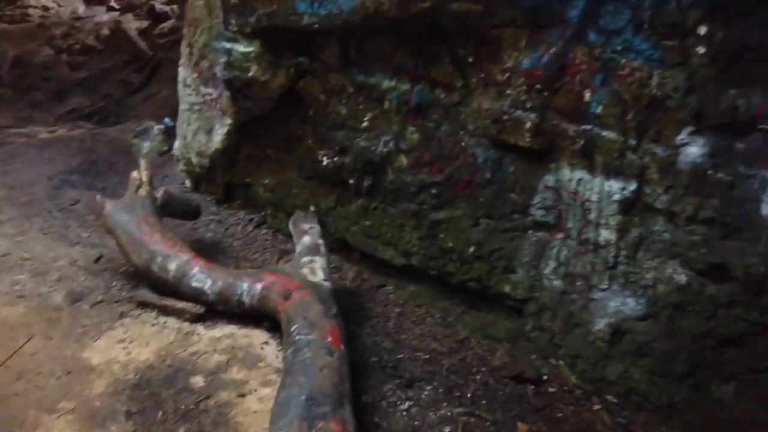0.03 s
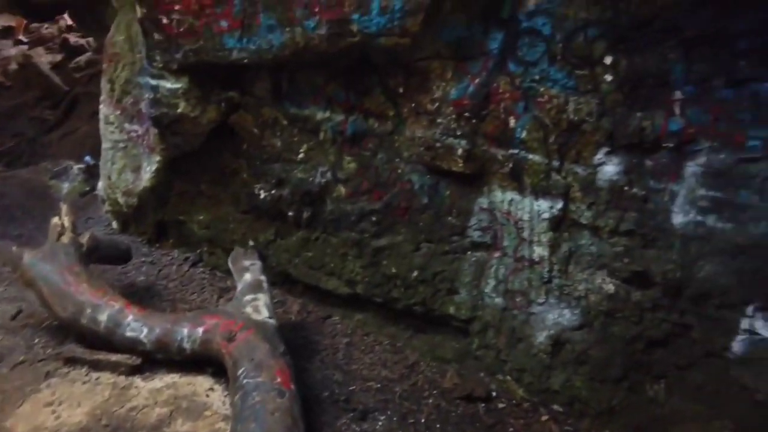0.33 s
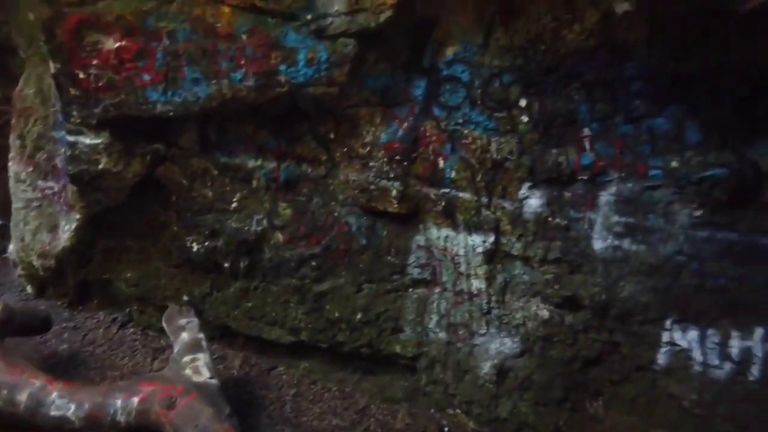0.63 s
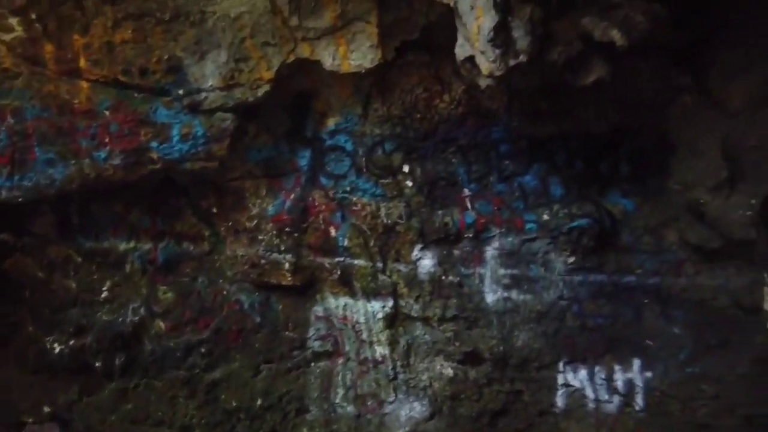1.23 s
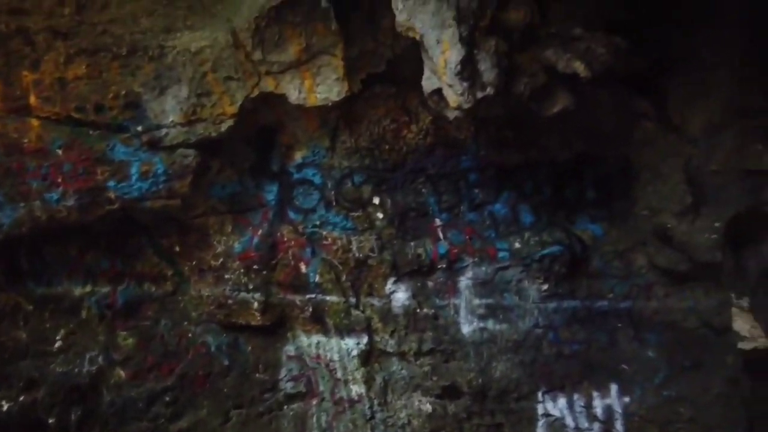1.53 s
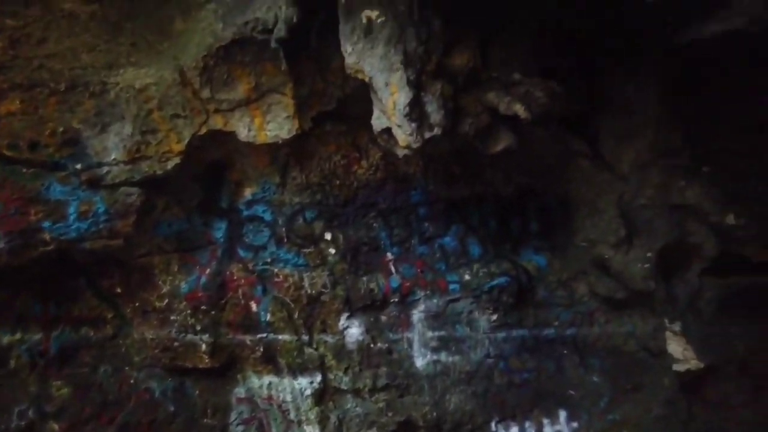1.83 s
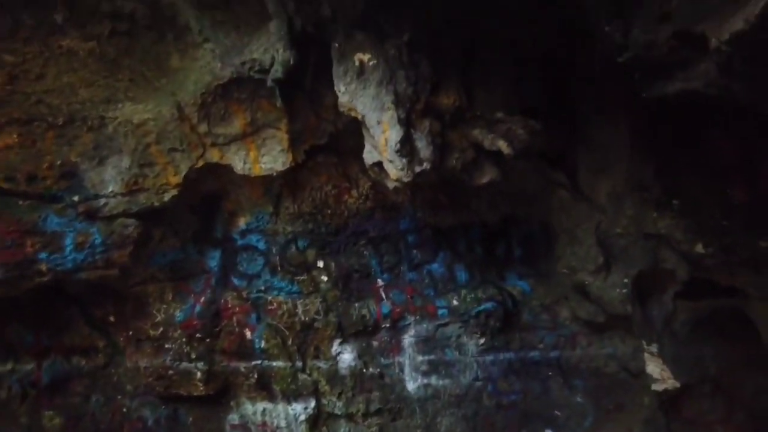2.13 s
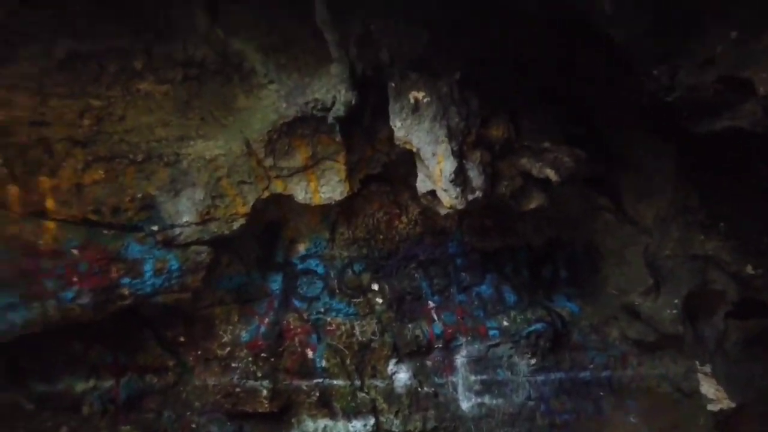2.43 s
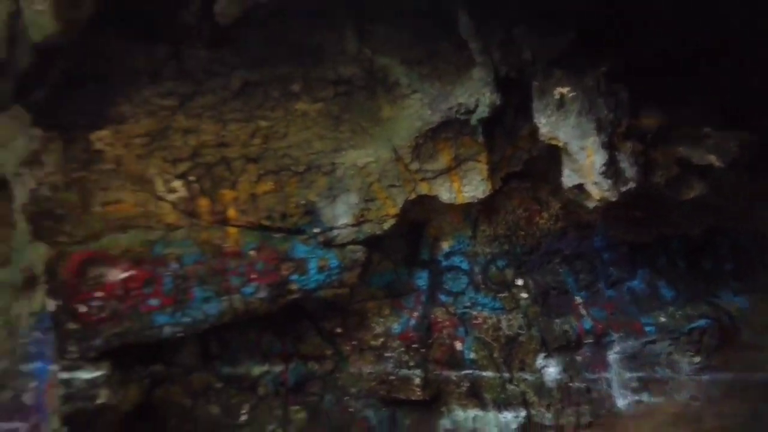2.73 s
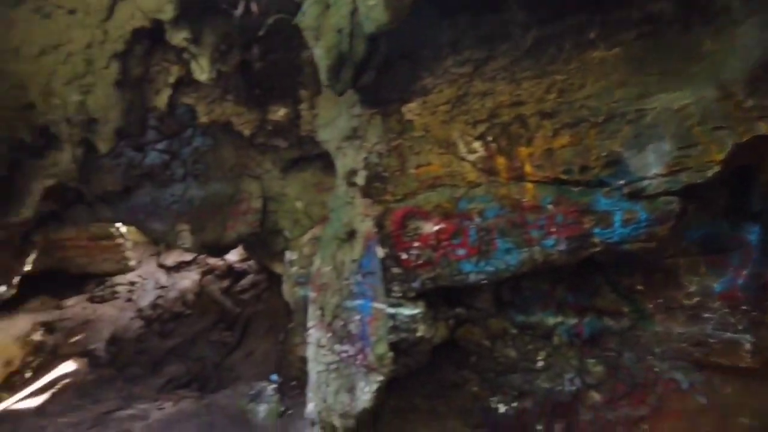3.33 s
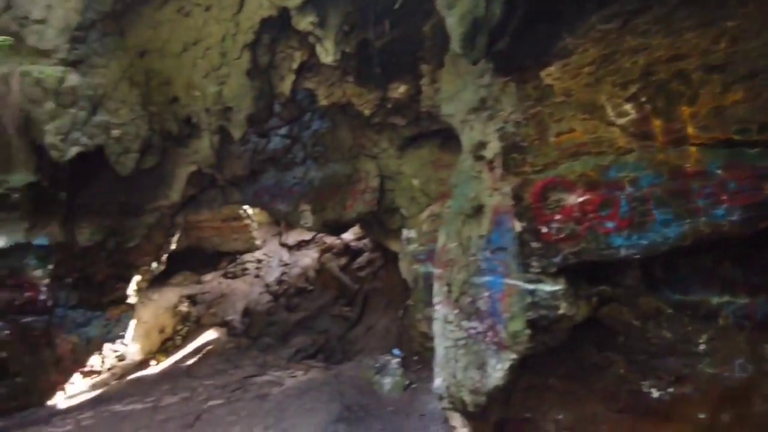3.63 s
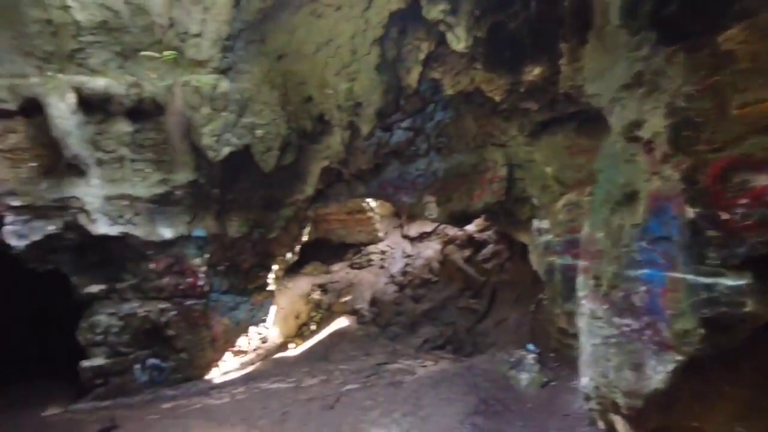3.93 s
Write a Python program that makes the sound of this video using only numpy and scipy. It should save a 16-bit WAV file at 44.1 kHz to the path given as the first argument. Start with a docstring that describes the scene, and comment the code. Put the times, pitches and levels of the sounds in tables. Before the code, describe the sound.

A muffled, far-off engine rumbles through a cave, speeding up briefly, then slowing. Soft thuds come early; then, near the microphone, a heel crunches grit, a heavier step rings hollow and feet shuffle lightly.

```python
"""Inside a shallow cave, a stereo microphone close to someone's feet. From the start a distant engine
throbs through the rock, under thin steady hiss and a faint whistle that comes and goes. It revs once in
the first second, among soft low bumps, then sinks slowly back to idle. Meanwhile clothing brushes and
shoes scuff the gritty floor, the walls answering briefly. A heel crushes grit at 1.3 s, a sole squeaks,
and just after 2 s the heaviest step rings hollow. A last light shuffle comes near the end."""
import sys
import numpy as np
from scipy import signal
from scipy.fft import rfft, irfft, next_fast_len
from scipy.io import wavfile
from scipy.ndimage import map_coordinates

SR = 44100
rng = np.random.default_rng(int(sys.argv[2]) if len(sys.argv) > 2 else 0)


def unload_audio(sound):
    """Save the sound as a 16-bit wav file, at the path given as the first command line argument."""
    columns = np.transpose(np.atleast_2d(sound))
    # keep every value between -1 and 1, then stretch to whole-number steps
    steps = np.round(np.clip(columns, -1, 1) * 32767)
    wavfile.write(sys.argv[1], SR, steps.astype(np.int16))


N = 176400

# The far engine. Each row: time in seconds, exhaust pulses per second.
ENGINE_SPEED = [(0, 24.06), (0.23, 23.34), (0.4, 27.78), (0.55, 32.2), (0.7, 33.4), (0.9, 32.7),
                (1.1, 31.12), (1.3, 29.52), (1.6, 27.81), (1.9, 26.02), (2.3, 25.39), (2.5, 24.05),
                (2.7, 23.59), (2.9, 21.95), (3.2, 21.73), (3.4, 20.62), (3.6, 20.57), (4, 20.02)]
# Its throb, extra gain on its upper harmonics, its boom and its exhaust rush.
# Each row: time in seconds, gain in dB.
THROB_GAIN = [(0, 2), (.25, 1), (.65, -4), (.95, 1.5), (1.3, 2.5), (1.52, -4), (1.78, 2), (2.2, 2.5),
              (2.4, -4), (2.6, 1), (2.8, -3), (2.9, .5), (3.3, 0), (3.45, -3), (4, 0)]
UPPER_GAIN = [(0, 1.5), (.65, 0), (.85, -4), (1.4, -3.5), (2, 4), (2.9, -1), (3.5, 1), (3.9, 2.5)]
BOOM_GAIN = [(.45, -74), (.57, -51), (.86, -47.5), (1.02, -48.5), (1.09, -62), (1.22, -59), (1.4, -76)]
RUSH_GAIN = [(.22, -64), (.32, -56), (.48, -59.5), (.6, -51.5), (.77, -60), (1.2, -61.5), (2.1, -68),
             (4, -73)]
# Exhaust and cave resonating together, then the rush. Each row: frequency in Hz, gain in dB.
EXHAUST_RESONANCE = [(60, -76), (82, -67), (98, -54), (107, -62), (113, -56), (120, -56), (126, -51),
                     (131, -47.5), (136, -49), (143, -55), (151, -65), (160, -55), (168, -67), (182, -65),
                     (198, -73), (218, -76), (241, -70), (255, -77), (285, -77), (314, -77), (328, -68),
                     (338, -69.5), (356, -79), (420, -95)]
RUSH_COLOUR = [(40, -27), (90, -15), (150, 2), (210, -4), (350, -9), (440, -21), (2000, -58)]

# The hiss all around. Each row: time in seconds, gain in dB.
HISS_GAIN = [(0, -75), (1.6, -72), (2.6, -75), (4, -75.5)]
# Background colours. Each row: frequency in Hz, relative level in dB.
HISS_COLOUR = [(260, -30), (450, -3.5), (972, -8), (2190, -7), (5000, -15), (9650, -18.5), (14000, -15.5),
               (15500, -23)]
RUMBLE_COLOUR = [(24, -2.5), (45, -6), (400, -25), (900, -51.5)]
WHISTLE_COLOUR = [(1050, -30), (1240, -8), (1305, 2), (1380, -10), (1800, -28)]
# The faint whistle. Each row: start in seconds, level in dB, rise and 60 dB decay in seconds.
WHISTLES = [(-.05, -68, 0.047, 0.55), (2.26, -73.5, .12, 1.2), (3.66, -73.5, 0.081, 8)]
# Stereo width of hiss and echo, then of rush, whistle and rubbing.
# Each row: frequency in Hz, left-right correlation.
DIFFUSE_CORRELATION = [(300, 1), (1000, 0.63), (4000, -0.0097), (12000, 0.7)]
SOURCE_CORRELATION = [(300, 1), (1100, 0.97), (2300, 0.63), (4000, -0.2), (12000, 0.2)]

# Shoes and clothing, close up. Each row: start in seconds, level in dB, rise and 60 dB decay in seconds.
GRIT_GRINDS = [(.05, -70, 0.0041, 0.95), (.91, -72, 0.053, 1.1), (1.325, -61, 0.037, 0.97),
               (1.62, -73, 0.036, 2), (2.072, -55.5, 0.046, 0.24), (3.608, -70.5, 0.037, 1.8),
               (3.7, -69, 0.11, 0.86)]
FABRIC_SWISHES = [(.375, -67.5, 0.022, .14), (1.72, -72, .08, 0.34)]
SOLE_SCUFFS = [(.965, -61.5, 0.043, 0.34), (1.335, -60, .045, 0.35), (2.071, -43, 0.055, 0.45)]
SAND_AND_CLOTH_SCRAPES = [(1.335, -61, 0.025, 0.32), (1.88, -69, 0.011, 0.31), (2.92, -75, 0.032, 0.71),
                          (3.59, -68, 0.06, 0.4), (3.68, -70.5, .07, .7)]
HEEL_CRUNCH = (1.337, -51.5, .008, .14)
SOLE_SQUEAKS = [(1.897, -59.5, 0.007, 0.4), (3.62, -70, 0.03, 0.3)]
# Their colours at the microphone. Each row: frequency in Hz, relative level in dB.
GRIT_COLOUR = [(400, -13), (1300, -1), (2550, 0), (3200, -5.5), (4200, -18.5), (12000, -24.5), (16000, -37)]
SWISH_COLOUR = [(10500, -16), (14200, 7), (15600, -17)]
SCUFF_COLOUR = [(80, -1), (400, 1.5), (520, -3), (680, 0), (800, -7), (1030, -4), (1300, -13),
                (2400, -16.5), (6000, -60)]
SCRAPE_COLOUR = [(800, -4), (4600, 1), (8200, -1), (11000, 0), (15500, -7)]
CRUNCH_COLOUR = [(1500, -11), (4500, 2), (8000, -13), (11000, 0), (15500, -14)]
SQUEAK_COLOUR = [(1900, -14), (2350, -5), (2480, 2), (2750, -1), (3200, -7), (4500, -26)]
# Echo off the walls. Each row: frequency in Hz, 60 dB decay in seconds.
CAVE_DECAY = [(500, 0.43), (12000, 0.083)]
# Soft thuds. Each row: start in seconds, level in dB, frequency in Hz.
LOW_BUMPS = [(0.294, -38, 140.2), (.385, -40, 124), (.535, -37.5, 155.7), (2.85, -45, 128)]
# Ring of the heaviest step. Each row: frequency in Hz, dB against its scuff, 60 dB decay in seconds.
HOLLOW_MODES = [(334, -11, .6), (657, -1.5, .33), (986, -14, .33)]

TIME = np.arange(N) / SR


def amp(db):
    """Decibels to gain."""
    return 10 ** (np.asarray(db) / 20)


def unit(x):
    """Scale to rms 1."""
    return x / np.sqrt(np.mean(x ** 2) + 1e-20)


def along(points, hz):
    """Read (Hz, value) points on a log frequency axis."""
    freqs, values = np.transpose(points)
    return np.interp(np.log(hz + 1), np.log(freqs + 1), values)


def curve(rows):
    """(seconds, value) points as one value per sample."""
    return np.interp(TIME, *np.transpose(rows))


def wobble(per_s):
    """A smooth random curve with per_s knots a second."""
    return map_coordinates(rng.standard_normal(int(N * per_s / SR) + 4), [TIME * per_s])


def filtered(x, response):
    """Filter x by a function of frequency in Hz."""
    size = next_fast_len(N + SR // 2)
    return irfft(rfft(x, size) * response(np.fft.rfftfreq(size, 1 / SR)), size)[..., :N]


def ringing(colour, hz):
    """Complex response of a causal resonator with the given colour."""
    grid = np.fft.rfftfreq(SR, 1 / SR)
    cepstrum = irfft(np.log(amp(along(colour, grid))))
    cepstrum[1:SR // 2] *= 2  # fold to minimum phase
    cepstrum[SR // 2 + 1:] = 0
    return np.interp(hz, grid, np.exp(rfft(cepstrum)))


def noise(colour, correlation):
    """Coloured mid-side noise, as left and right at rms 1."""
    def mid_side(hz):
        angle = np.arccos(np.clip(along(correlation, hz), -1, 1)) / 2
        return amp(along(colour, hz)) * [np.cos(angle), np.sin(angle)]
    mid, side = filtered(rng.standard_normal((2, N)), mid_side)
    return unit(np.array([mid + side, mid - side]))


def swell(start, db, rise, t60):
    """Envelope that rises from start, then dies away."""
    age = TIME - start
    return amp(db - 60 * np.maximum(age - rise, 0) / t60) * np.clip(age / rise, 0, 1) ** 2


def grainy_swells(strokes, colour, grain_db):
    """Swells of noise in one colour, roughened by a fast flutter in level."""
    power = sum(swell(*stroke) ** 2 for stroke in strokes)
    return np.sqrt(power) * unit(noise(colour, SOURCE_CORRELATION) * amp(grain_db * wobble(per_s=260)))


def distant_engine(first_pulse_s=.011, upper_hz=197, scatter_rad=.11, waver_rad=.3, waver_db=1.8):
    """Beyond the rock, exhaust harmonics slide through low resonances; boom and rush come with load."""
    pulse_hz, upper_db = curve(ENGINE_SPEED), curve(UPPER_GAIN)
    phase = 2 * np.pi * (np.cumsum(pulse_hz) / SR - first_pulse_s * pulse_hz[0])
    throb = 0
    for k in range(3, 18):
        hz = k * pulse_hz
        angle = k * (phase + scatter_rad * rng.normal())  # the cave scatters the phases
        angle += waver_rad * wobble(4)
        harmonic = np.real(ringing(EXHAUST_RESONANCE, hz) * np.exp(1j * angle))
        throb += harmonic * amp(waver_db * wobble(3.81) + upper_db / (1 + (upper_hz / hz) ** 10))
    throb *= amp(curve(THROB_GAIN))
    boom = np.sin(2 * phase) * amp(curve(BOOM_GAIN))
    rush = noise(RUSH_COLOUR, SOURCE_CORRELATION) * amp(curve(RUSH_GAIN))
    return np.sqrt(2) * (throb + boom) + rush


def cave_air(hiss_trim_db=0.5, waver_db=0.94, rumble_db=-65.5):
    """All around the microphone, a faint wavering hiss over a deep rumble."""
    hiss = noise(HISS_COLOUR, DIFFUSE_CORRELATION)
    hiss *= amp(curve(HISS_GAIN) + hiss_trim_db + waver_db * wobble(10))
    return hiss + amp(rumble_db) * noise(RUMBLE_COLOUR, correlation=[(20, 0.45), (100, 0.8)])


def whistle():
    """In the background, a narrow airy band of noise comes and goes."""
    return grainy_swells(WHISTLES, WHISTLE_COLOUR, grain_db=1.5)


def shoes_and_clothing():
    """Someone turns on the spot by the microphone: soles rub on grit and sand, fabric brushes."""
    return (grainy_swells(SOLE_SCUFFS, SCUFF_COLOUR, grain_db=-1)
            + grainy_swells(GRIT_GRINDS, GRIT_COLOUR, grain_db=0.5)
            + grainy_swells(SOLE_SQUEAKS, SQUEAK_COLOUR, grain_db=0.5)
            + grainy_swells(SAND_AND_CLOTH_SCRAPES, SCRAPE_COLOUR, grain_db=1.5)
            + grainy_swells(FABRIC_SWISHES, SWISH_COLOUR, grain_db=1.5))


def cave_echo(near):
    """The rock walls answer, the treble dying first; the bass is alike in both channels."""
    white = noise([(1, 0)], DIFFUSE_CORRELATION)[:, :SR]
    hz, age, spectra = signal.stft(white, SR, nperseg=256)
    decay = amp(-60 * age / along(CAVE_DECAY, hz)[:, None])
    _, tail = signal.istft(spectra * decay, SR, nperseg=256)
    return signal.fftconvolve(near.mean(0)[None], tail / np.linalg.norm(tail[0]), axes=1)[:, :N]


def low_bumps():
    """Soft thuds of a few low cycles, dead centre."""
    return sum(swell(start, db, rise=.016, t60=0.093) * np.sin(2 * np.pi * hz * (TIME - start))
               for start, db, hz in LOW_BUMPS)


def heel_crunch(cracks_per_s=2500, left_lag_s=.0001):
    """Grains crack under a heel: dense sharp ticks that reach the microphone's right side first."""
    ticks = rng.standard_normal(N) * (rng.random(N) < cracks_per_s / SR)
    cracks = swell(*HEEL_CRUNCH) * unit(filtered(ticks, lambda hz: ringing(CRUNCH_COLOUR, hz)))
    delay_s = np.array([[.5], [-.5]]) * left_lag_s
    return filtered(cracks, lambda hz: np.exp(-2j * np.pi * hz * delay_s))


def hollow_step(waver_rad=.5):
    """Close by, the heaviest step rings a few hollow modes."""
    start, step_db, rise, _ = SOLE_SCUFFS[-1]
    return sum(swell(start, step_db + db, rise, t60)
               * np.sin(2 * np.pi * hz * TIME + waver_rad * wobble(90)) for hz, db, t60 in HOLLOW_MODES)


def scene(echo_db=-13.5):
    """Close movement and its echo, in front of the far engine and the cave's background."""
    near = shoes_and_clothing() + heel_crunch() + hollow_step()
    return distant_engine() + low_bumps() + near + amp(echo_db) * cave_echo(near) + whistle() + cave_air()


def record(dry, top_hz=15650):
    """The microphone chain passes nothing above its band limit."""
    return filtered(dry, lambda hz: hz < top_hz)


dry = scene()
out = record(dry)
unload_audio(out)
```